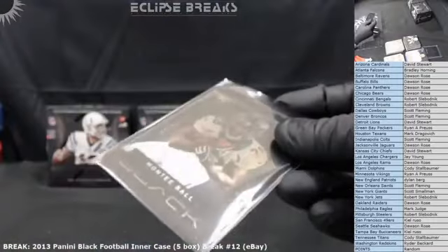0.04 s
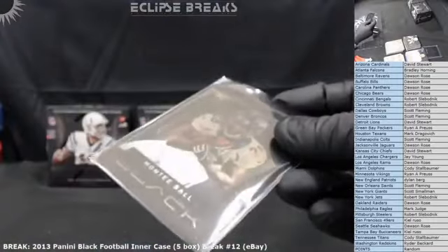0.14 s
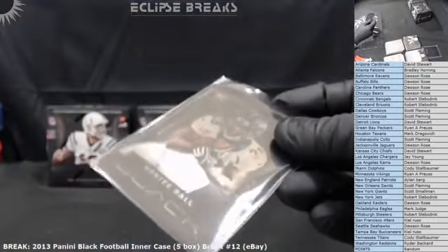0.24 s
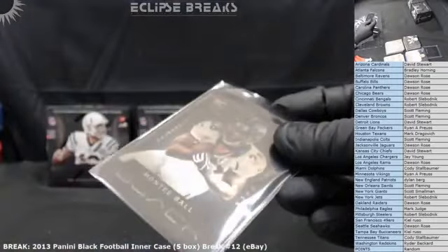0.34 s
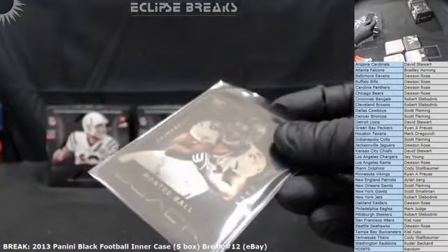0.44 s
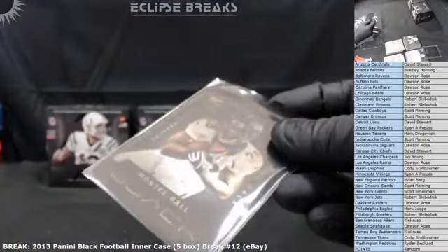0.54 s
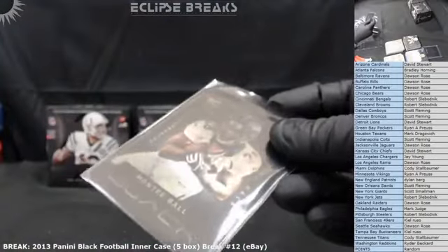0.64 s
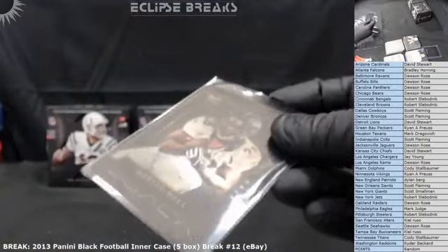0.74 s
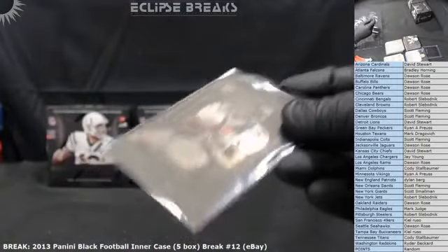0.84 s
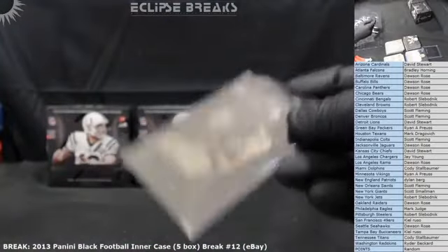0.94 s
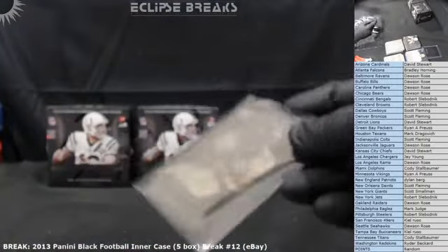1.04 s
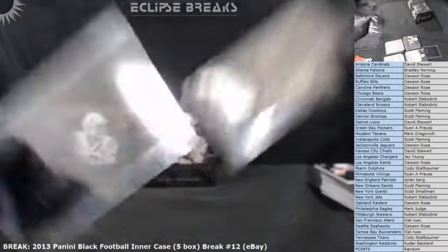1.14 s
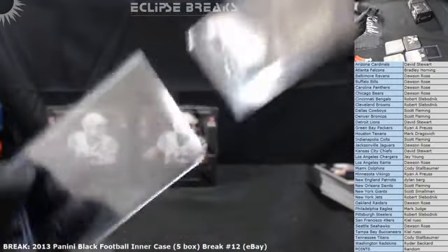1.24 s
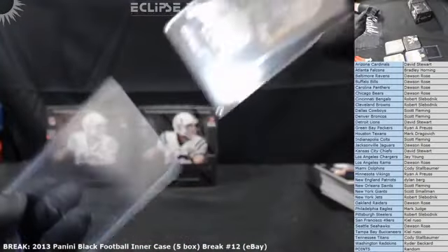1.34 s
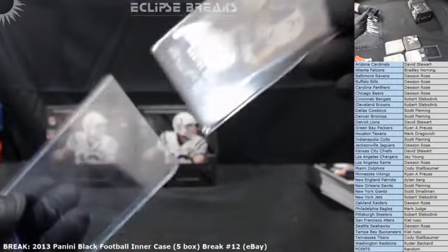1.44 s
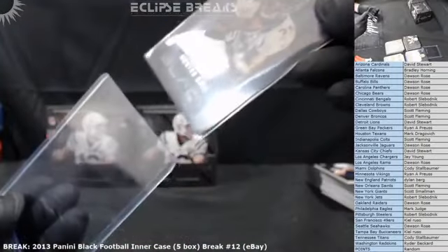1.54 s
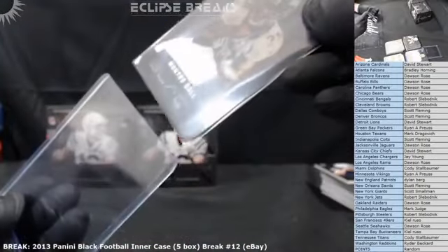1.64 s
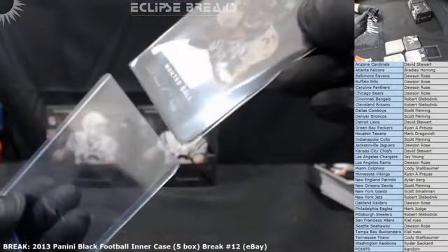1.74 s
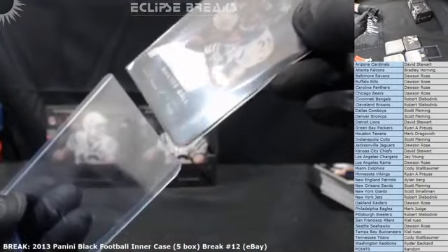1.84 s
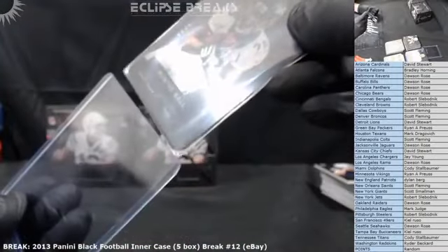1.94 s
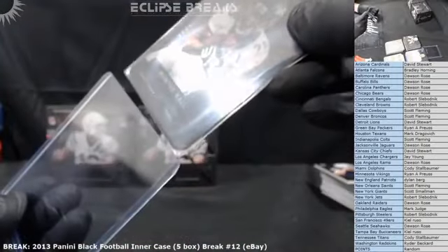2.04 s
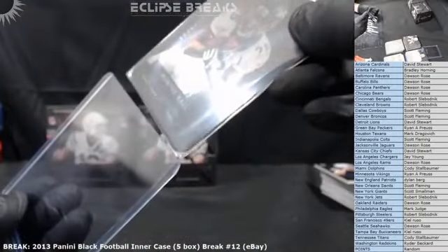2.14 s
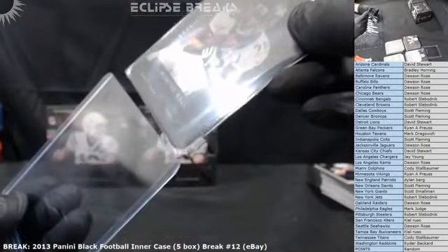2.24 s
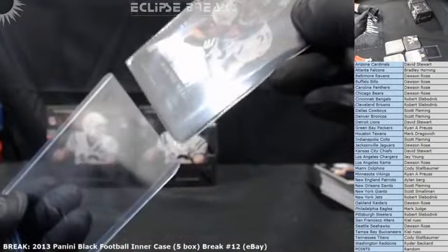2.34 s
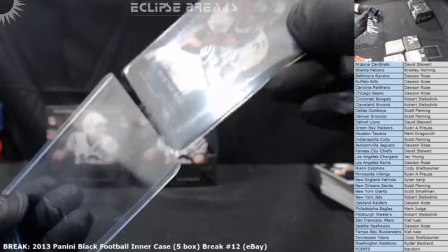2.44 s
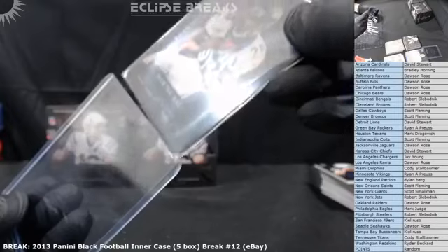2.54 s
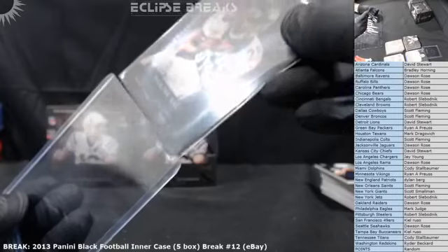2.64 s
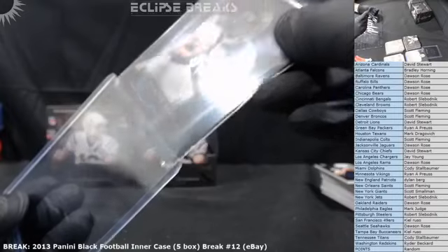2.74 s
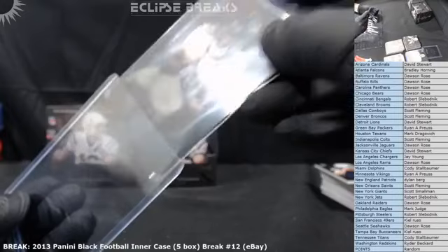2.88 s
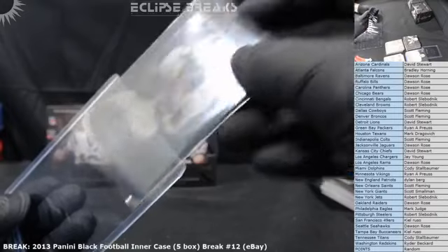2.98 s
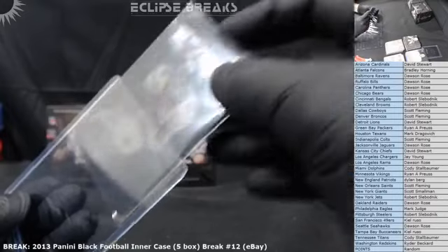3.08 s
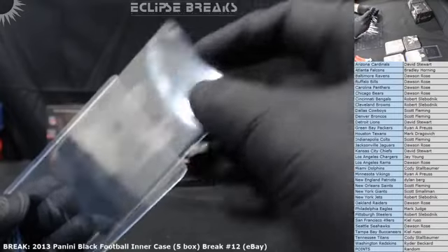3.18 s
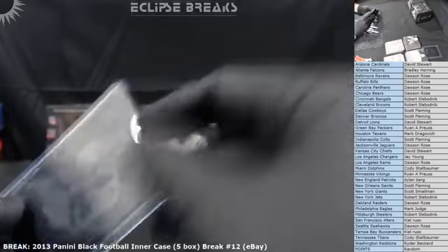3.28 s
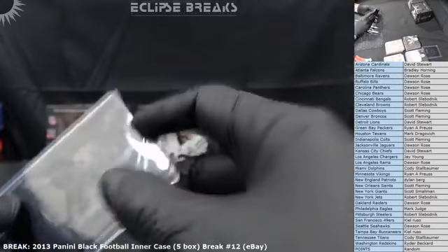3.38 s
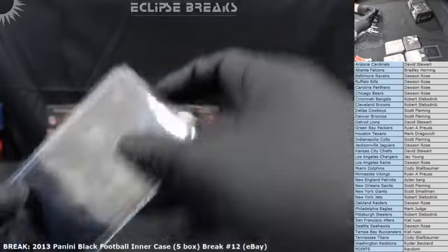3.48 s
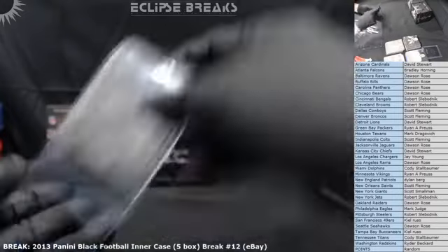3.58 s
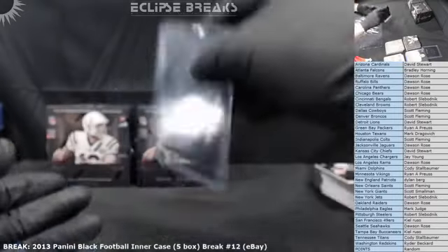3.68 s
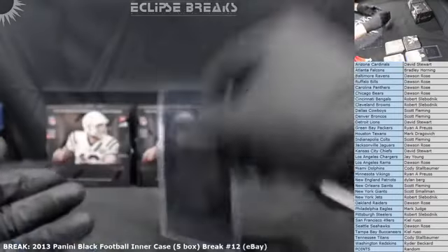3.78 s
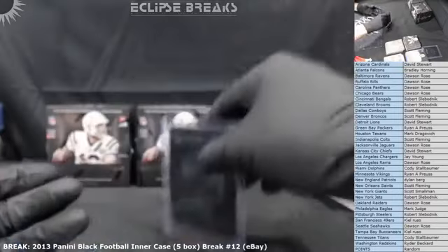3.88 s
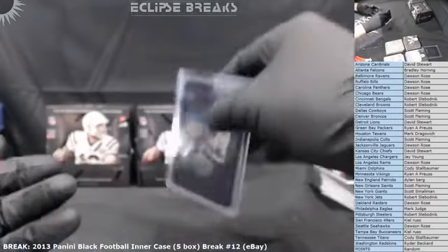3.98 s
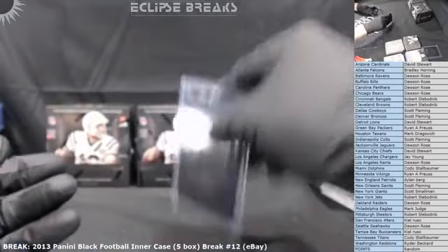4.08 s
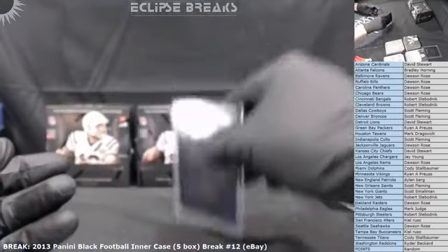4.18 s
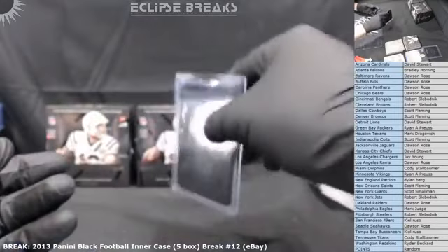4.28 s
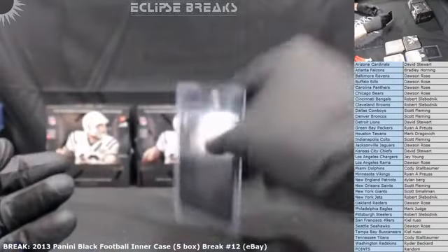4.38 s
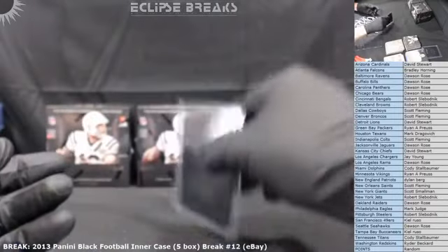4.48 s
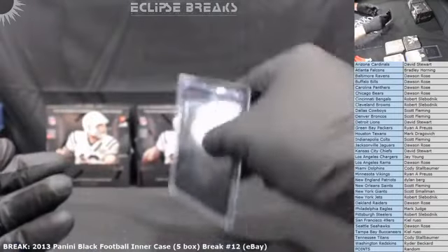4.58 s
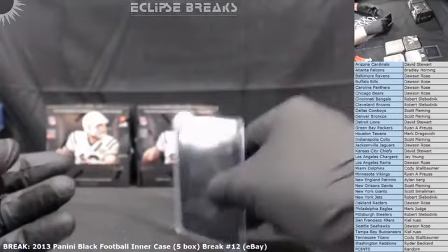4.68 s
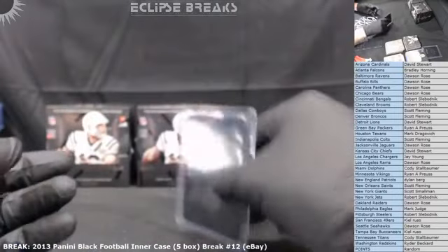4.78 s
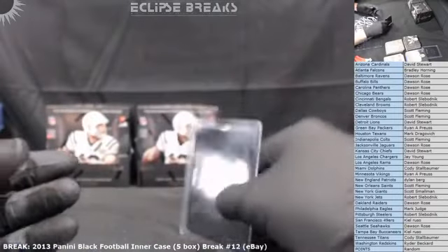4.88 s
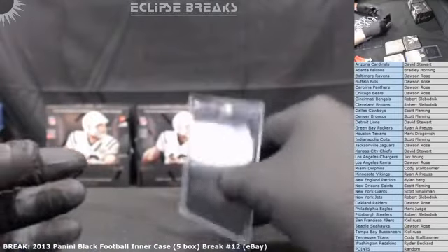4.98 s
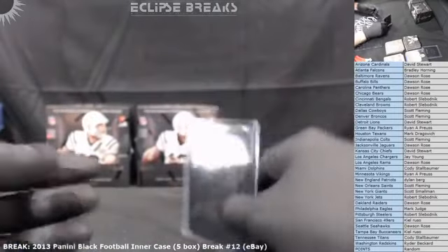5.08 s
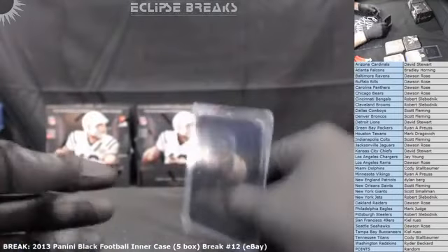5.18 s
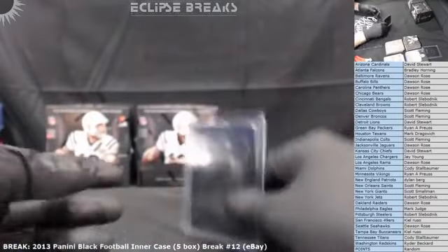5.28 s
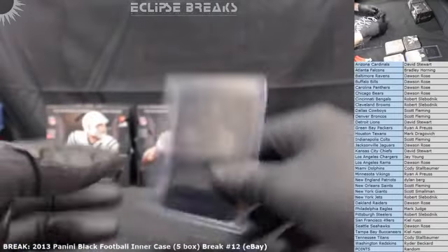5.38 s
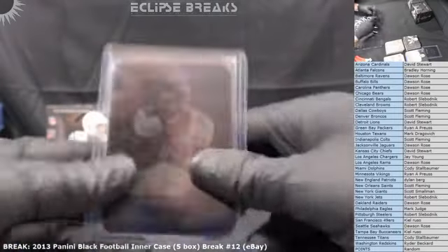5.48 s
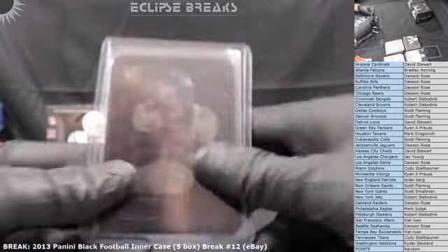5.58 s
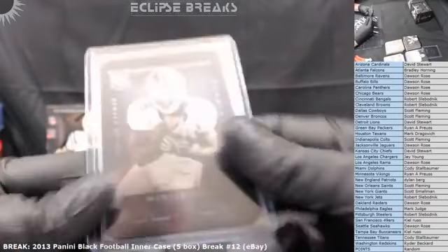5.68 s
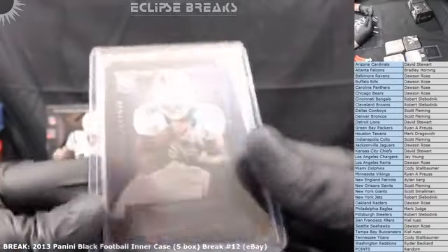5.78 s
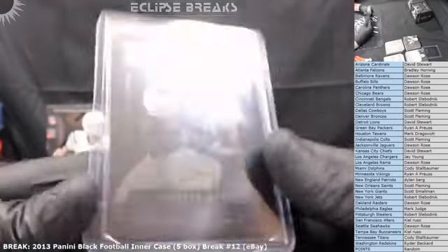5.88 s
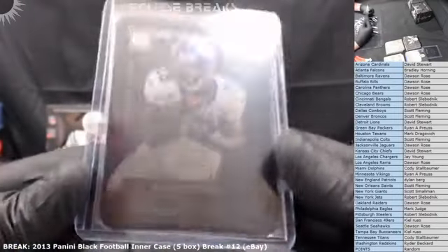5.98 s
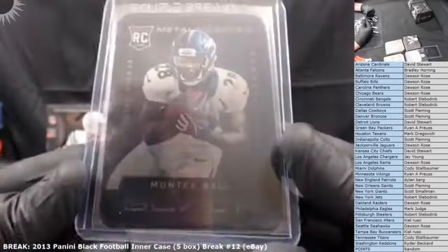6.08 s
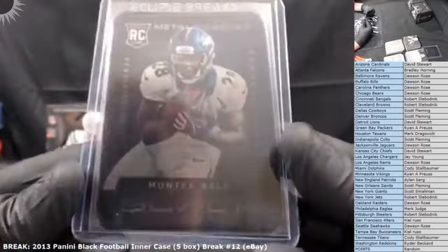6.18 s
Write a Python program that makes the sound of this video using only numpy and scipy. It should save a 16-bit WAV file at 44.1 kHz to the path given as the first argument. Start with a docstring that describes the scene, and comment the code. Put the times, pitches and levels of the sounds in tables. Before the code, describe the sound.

Gloved fingers softly rustle a sleeved trading card, with a few dull bumps on a table. The card slides into a rigid plastic holder with a fine hiss and a faint squeak, stopping with a click. The holder is tapped on the table seven times, each loud clack bringing a thump and slight distortion. Light rubbing and small clicks follow. A close stereo microphone picks up low rumble and a thin electrical whine in the small room.

```python
"""Trading card into a plastic holder

Close up, on a small stereo microphone at a table in a small room. After a few soft bumps a sleeved card
slides into a rigid holder, hissing with tiny slips, squeaks faintly and stops with a click. The holder
is tapped seven times to seat the card: it clacks, the table thumps and rings, and the input overloads.
Gloved fingers then turn it over, above a low room rumble and a thin electrical whine."""
import sys
import numpy as np
from scipy import signal
from scipy.fft import rfft, irfft, next_fast_len
from scipy.io import wavfile
from scipy.ndimage import map_coordinates

SR = 44100
rng = np.random.default_rng(int(sys.argv[2]) if len(sys.argv) > 2 else 0)


def bounce(signal):
    """Save signal as a 16-bit WAV file at the path given by the first command-line argument."""
    frames = np.transpose(np.atleast_2d(signal))
    limited = np.clip(frames, -1, 1)
    pcm = np.round(limited * 32767).astype(np.int16)
    wavfile.write(sys.argv[1], SR, pcm)


N = 274302

# room tone: freq_hz, relative_db
RUMBLE_SPECTRUM = [(12, -20.5), (20, 2.5), (51, -2.5), (70, -7.5), (119, -6), (271, -19), (366, -23),
                   (415, -22.5), (838, -31), (1020, -30), (1100, -32), (1650, -34), (1970, -39.5),
                   (8000, -50), (10400, -74), (17600, -120)]
# steady electrical tones: pitch_hz, level_db
WHINE_TONES = [(1001, -84), (1200, -91.5), (1599, -91.5), (1798, -96.5), (3601, -103), (6998, -101),
               (7499, -103), (8000, -86.5)]
# decay of the small room: freq_hz, t60_s
ROOM_DECAY = [(60, 0.71), (160, 0.24), (420, 0.21), (1100, 0.24), (3000, 0.24), (5000, 0.26), (7500, 0.16)]
# likeness of the sound at the microphone's two ports: freq_hz, correlation (0-1)
PORT_LIKENESS = [(100, 0.91), (500, 0.89), (1200, 0.26), (3000, 0), (8000, 0.7)]
# the microphone's treble roll-off: freq_hz, gain_db
MIC_RESPONSE = [(7300, 2.5), (8000, -8), (8800, -20.5), (10000, -27), (14000, -33.5)]

# something dragged on the table: freq_hz, relative_db
DRAG_SPECTRUM = [(100, 8), (300, 15.5), (600, 4), (1000, 10.5), (1400, -6.5), (2500, -10.5), (7000, -21.5)]
# soft bumps of things handled on the table: start_s, level_db
SOFT_BUMPS = [(0.464, -48), (0.508, -46), (0.586, -49.5), (0.657, -50.5), (0.693, -31), (0.702, -45),
              (0.715, -39), (5.525, -54.5), (5.759, -57.5), (5.79, -61.5)]
# one soft bump: freq_hz, relative_db
BUMP_SPECTRUM = [(60, -15), (180, 0), (310, 10), (550, -1.5), (800, -1.5), (1050, -13.5), (1350, -16),
                 (1900, -33.5), (3500, -32.5), (7000, -46.5)]
# dull low thuds carried through the table, from handling and from the holder's corner landing:
# start_s, level_db, pitch_hz
TABLE_THUDS = [(0.511, -39, 92), (0.584, -49, 69.6), (1.304, -31, 56.4), (1.463, -44.5, 59.7),
               (3.272, -28.5, 60), (3.821, -14.5, 98.5), (5.511, -42.5, 72)]
# small plastic clicks: start_s, level_db, centre_hz, width_octaves, t60_s
EDGE_CLICKS = [(0.869, -59.5, 1850, 0.86, 0.027), (2.497, -68, 2900, 0.93, .012),
               (2.687, -62.5, 3500, 1.2, 0.012), (3.022, -62, 2340, 0.7, 0.0089),
               (3.457, -57, 3070, 0.25, 0.032), (3.479, -62, 4540, 0.85, .023),
               (3.518, -61.5, 6920, 0.23, 0.036), (4.939, -58, 2950, 0.88, .016),
               (5.511, -49, 2350, 2.6, 0.018), (5.523, -51, 1510, 2, 0.019),
               (5.555, -49.5, 1400, 0.64, 0.029), (5.569, -50, 1490, 1.5, 0.01),
               (5.947, -54.5, 4750, 2.2, 0.014)]

# fine hiss of sliding plastic: freq_hz, relative_db
HISS_SPECTRUM = [(1500, -32), (3500, 1), (5000, 0.5), (6500, 1.5), (7600, -1.5), (8400, 3), (9500, -6.5)]
# the lower scrape under it: freq_hz, relative_db
SCRAPE_SPECTRUM = [(200, -5), (600, 5.5), (1200, -1.5), (2500, -3), (4000, -8), (7000, -31.5)]
# gloved fingers brush sleeve and holder: peak_s, length_s, hiss_db, scrape_re_hiss_db
FINGER_STROKES = [(.01, 0.1, -79, -4), (.14, 0.066, -81, -3), (.33, 0.041, -78.5, -2),
                  (.45, 0.087, -75.5, 6.5), (.52, 0.038, -75, 2), (.6, 0.098, -91, 0),
                  (.73, 0.044, -74.5, 10), (.795, 0.11, -72, -2), (.925, .04, -76, -10),
                  (.97, 0.11, -75, 2.5), (1.06, 0.03, -76, -6), (1.11, 0.11, -83.5, 7.5),
                  (1.33, 0.26, -84, 5), (3.29, 0.1, -75.5, 7.5), (3.365, 0.075, -71.5, 2.5),
                  (3.455, 0.035, -68, 4.5), (3.515, 0.056, -73.5, 7.5), (3.63, 0.19, -76, 0),
                  (4.96, 0.14, -78.5, 2.5), (5.18, 0.11, -76.5, 2.5), (5.28, 0.12, -76, 0.5),
                  (5.496, 0.2, -75, 4), (5.595, 0.03, -79, 7), (5.715, 0.12, -67.5, -1),
                  (5.835, 0.058, -71.5, 3), (5.915, 0.11, -70, -3.5), (6.11, 0.2, -71.5, -2.5)]
# the card is pushed home, rubbing harder as it goes deeper: time_s, hiss_db
CARD_PUSH = [(2.66, -89), (2.8, -78), (2.93, -73.5), (3.12, -72), (3.265, -60.5)]
# the sleeve squeaks as it enters: time_s, pitch_hz, level_db
SQUEAK_PATH = [(2.865, 6600, -91), (2.88, 6800, -66.5), (2.91, 7300, -71), (2.939, 7800, -79)]

# the holder's edge hits the table: start_s, clack_db, hardness_hz, second_corner_lag_s,
# second_re_first_db, ring_db, thump_hz, thump_t60_s, sway_db
HOLDER_TAPS = [(3.8049, -11.5, 3020, 0.016, -8.5, -21, 309, 0.045, -25.5),
               (4.0990, -12.5, 5000, 0.0067, -4, -21.5, 116.4, .1, -29),
               (4.3958, -10, 8000, 0.0021, 0.5, -27.5, 126.8, 0.11, -21),
               (4.6581, -12, 4480, .0081, -6.5, -20, 119, 0.089, -26.5),
               (4.8275, -16.5, 4000, .0031, 1.5, -21.5, 113.7, 0.074, -28),
               (5.0600, -20, 1700, 0.0028, 3.5, -28, 83.8, 0.073, -21),
               (5.2186, -22, 1700, .0029, 0.5, -28, 112, 0.058, -22.5)]
# the holder's clack: freq_hz, relative_db
CLACK_SPECTRUM = [(100, 4.5), (300, 7), (600, 10), (1200, -0.5), (1700, -9), (2200, -8), (2650, -16.5),
                  (3100, -13), (3700, -25), (6000, -25.5), (7300, -23), (8500, -31)]
# resonances of the table: pitch_hz, level_re_ring_db, t60_s
TABLE_MODES = [(129, -1, 0.23), (157, -26.5, 0.41), (190, 2.5, 0.078), (237.3, -4.5, 0.15),
               (278.4, -20.5, 0.44), (325.6, -5.5, 0.22), (368.6, -16.5, 0.2), (424, -3, 0.13),
               (487, -7, 0.16), (545.6, -0.5, 0.08), (575, -2, 0.092), (615, -2, 0.16), (751, -10, 0.074),
               (781, -13.5, 0.14), (920, -34, 0.19), (1374, -22, 0.058)]

THUD_BUILD_CYCLES = 0.39  # the heavy table top is slow to start


def amp(db):
    """Decibels to gain."""
    return 10 ** (np.asarray(db) / 20)


def unit(x):
    """Scale to rms 1."""
    return x / np.sqrt(np.mean(x ** 2) + 1e-20)


def along(points, hz):
    """Read (freq_hz, value) points on a log frequency axis."""
    freqs, values = np.transpose(points)
    return np.interp(np.log(hz + 1), np.log(freqs + 1), values)


def clock(size):
    """Seconds for each sample."""
    return np.arange(size) / SR


def wobble(rate_hz):
    """A smooth random curve with rate_hz knots a second."""
    knots = rng.standard_normal(int(N * rate_hz / SR) + 4)
    return map_coordinates(knots, [np.arange(N) * rate_hz / SR])


def held(start_s, end_s, fade_s):
    """Gain 1 from start to end, fading away on both sides."""
    t = clock(N)
    return np.exp(-np.abs(t - np.clip(t, start_s, end_s)) / fade_s)


def add(track, start_s, sound):
    """Mix a sound into the track."""
    part = track[:, round(start_s * SR):][:, :sound.shape[-1]]
    part += sound[..., :part.shape[1]]


def filtered(x, response):
    """Pass x through a complex response of frequency."""
    size = x.shape[-1]
    padded = next_fast_len(size + SR // 4)
    hz = np.fft.rfftfreq(padded, 1 / SR)
    return irfft(rfft(x, padded) * response(hz), padded)[..., :size]


def coloured(x, spectrum_db, size=4096):
    """Pass x through a causal filter of energy 1, shaped like spectrum_db(hz)."""
    hz = np.fft.rfftfreq(size, 1 / SR)
    cepstrum = irfft(np.log(amp(spectrum_db(hz))))
    cepstrum[1:size // 2] *= 2  # fold to minimum phase
    cepstrum[size // 2 + 1:] = 0
    kernel = irfft(np.exp(rfft(cepstrum)))
    return signal.fftconvolve(x, kernel[None] / np.linalg.norm(kernel), axes=1)[:, :x.shape[1]]


def port_noise(size):
    """White stereo noise, alike at both microphone ports in the bass and less so higher up."""
    def mid_side_gains(hz):
        angle = np.arccos(np.clip(along(PORT_LIKENESS, hz), -1, 1)) / 2
        return np.array([np.cos(angle), np.sin(angle)])
    mid, side = filtered(rng.standard_normal((2, size)), mid_side_gains)
    return np.array([mid + side, mid - side])


def steady_noise(spectrum):
    """Stereo noise of rms 1 with the given spectrum."""
    return unit(filtered(port_noise(N), lambda hz: amp(along(spectrum, hz))))


def in_room(x, wet_db):
    """The direct sound and the small room's answer, each frequency dying at its own speed."""
    hz, t, bands = signal.stft(port_noise(SR // 2), SR, nperseg=256)
    decay = amp(-60 * t / along(ROOM_DECAY, hz)[:, None])
    _, tail = signal.istft(bands * decay, SR, nperseg=256)
    tail *= np.clip(clock(tail.shape[1]) / 0.0073, 0, 1) ** 2  # reflections take a moment to gather
    response = amp(wet_db) * tail / np.linalg.norm(tail[0])
    response[:, 0] += 1
    return signal.fftconvolve(x, response, axes=1)


def strike(spectrum_db, t60_s, spike):
    """A contact: one sharp impulse and a dense, quickly dying ring."""
    t = clock(SR // 4)
    ring = port_noise(len(t)) * amp(-60 * t / t60_s)
    ring[:, 0] -= spike
    return coloured(ring, spectrum_db)


def mode(hz, t60_s, build_s=0.00092):
    """One struck resonance; it builds up briefly and reaches the two ports slightly out of step."""
    t = clock(SR // 2)
    phase = rng.normal(0, 0.14) * np.array([[1], [-1]])
    rise = 1 - np.exp(-(t / build_s) ** 2)
    return -np.sin(2 * np.pi * hz * t + phase) * amp(-60 * t / t60_s) * rise


def snap(centre_hz, octaves, t60_s):
    """A very short plastic snap: one broad hump of frequencies, almost dry."""
    hump_db = lambda hz: -10 * np.log10(1 + (np.log2((hz + 1) / centre_hz) / octaves) ** 4)
    return in_room(strike(hump_db, t60_s, spike=3), wet_db=-20)


def room_tone():
    """Low room rumble and a thin electrical whine."""
    whine = sum(amp(db) * np.sqrt(2) * np.sin(2 * np.pi * (hz * clock(N) + rng.random()))
                for hz, db in WHINE_TONES)
    return amp(-63.5) * steady_noise(RUMBLE_SPECTRUM) + whine


def table_handling():
    """A short drag, soft bumps and dull thuds stir mostly the table's low resonances."""
    drag = unit(steady_noise(DRAG_SPECTRUM) * amp(2.9 * wobble(rate_hz=54)))
    out = amp(-62.5) * held(start_s=0.41, end_s=0.67, fade_s=0.031) * drag
    for start_s, db in SOFT_BUMPS:
        bump = strike(lambda hz: along(BUMP_SPECTRUM, hz), t60_s=0.048, spike=7.1)
        add(out, start_s, in_room(amp(db) * bump, wet_db=-6.5))
    for start_s, db, hz in TABLE_THUDS:
        add(out, start_s, amp(db) * mode(hz, t60_s=0.081, build_s=THUD_BUILD_CYCLES / hz))
    return out


def edge_clicks():
    """Edges of card and holder catch and let go."""
    out = np.zeros((2, N))
    for start_s, db, centre_hz, octaves, t60_s in EDGE_CLICKS:
        add(out, start_s, amp(db) * snap(centre_hz, octaves, t60_s))
    return out


def finger_stroke(peak_s, length_s, rise_share=0.54):
    """Gain of one stroke: the finger speeds up, is fastest at peak_s and slows down."""
    t = clock(N) - peak_s
    width_s = length_s * np.where(t < 0, rise_share, 1 - rise_share)
    return np.exp(-np.abs(t / width_s) ** 1.3)  # between a point (1) and a bell (2)


def sliding():
    """Tiny slips make a fine hiss and a lower scrape, in the long push and in every finger stroke."""
    hiss = unit(steady_noise(HISS_SPECTRUM) * amp(1.8 * wobble(rate_hz=600)))
    scrape = unit(steady_noise(SCRAPE_SPECTRUM) * amp(2.5 * wobble(rate_hz=300)))
    times, push_db = np.transpose(CARD_PUSH)
    hiss_gain = amp(np.interp(clock(N), times, push_db)) * held(times[0], times[-1], fade_s=0.011)
    scrape_gain = amp(-5) * hiss_gain
    for peak_s, length_s, hiss_db, scrape_re_hiss_db in FINGER_STROKES:
        stroke = amp(hiss_db) * finger_stroke(peak_s, length_s)
        hiss_gain += stroke
        scrape_gain += amp(scrape_re_hiss_db) * stroke
    return hiss_gain * hiss + scrape_gain * scrape


def sleeve_squeak():
    """For a moment the slips lock into a thin rising tone."""
    t = clock(N)
    times, hz, db = np.transpose(SQUEAK_PATH)
    pitch_hz = np.interp(t, times, hz) * (1 + 0.012 * wobble(rate_hz=260))
    gain = amp(np.interp(t, times, db, left=-150, right=-150))
    return gain * np.sin(2 * np.pi * np.cumsum(pitch_hz) / SR)


def card_stop(stop_s=3.2714, wall_lag_s=0.001256):
    """The card hits the bottom of the holder: a bright tick, then the short clack of the walls."""
    out = np.zeros((2, N))
    add(out, stop_s, amp(-38.0) * snap(centre_hz=4500, octaves=0.8, t60_s=0.014))
    add(out, stop_s + wall_lag_s, amp(-32.5) * snap(centre_hz=1060, octaves=0.62, t60_s=0.019))
    return out


def holder_taps(thump_over_ring_db=15):
    """One corner lands just before the other; the holder clacks, the table rings, thumps and sways."""
    out = np.zeros((2, N))
    for tap in HOLDER_TAPS:
        start_s, clack_db, hardness_hz, lag_s, second_db, ring_db, thump_hz, thump_t60_s, sway_db = tap
        # a softer contact lacks treble
        contact_db = lambda hz: along(CLACK_SPECTRUM, hz) - 10 * np.log10(1 + (hz / hardness_hz) ** 2)
        for corner_s, db in (start_s, clack_db), (start_s + lag_s, clack_db + second_db):
            clack = amp(db) * strike(contact_db, t60_s=0.026, spike=4.8)
            add(out, corner_s, in_room(clack, wet_db=-13))
        scatter = rng.normal(0, [2, 0.006], (len(TABLE_MODES), 2))
        for k, ((hz, db, t60_s), (change_db, detune)) in enumerate(zip(TABLE_MODES, scatter)):
            ring = amp(ring_db + db + change_db) * mode(hz * (1 + detune), t60_s)
            add(out, start_s, (-1) ** k * ring)  # neighbouring modes swing oppositely
        thump = mode(thump_hz, thump_t60_s, build_s=THUD_BUILD_CYCLES / thump_hz)
        add(out, start_s, amp(ring_db + thump_over_ring_db) * thump)
        add(out, start_s, amp(sway_db) * mode(hz=70.0, t60_s=0.16, build_s=0.0059))
    return out


def scene():
    """The hands work close to the microphone, slightly to its left, over the room tone."""
    close = holder_taps() + table_handling() + edge_clicks() + card_stop() + sliding() + sleeve_squeak()
    return close * amp([[0.5], [-0.5]]) + room_tone()


def record(dry):
    """The microphone's input clips; its coupling makes the flat tops sag; the treble rolls off."""
    ceiling, hardness, coupling_hz, top_hz = amp(-19.0), 6, 32, 15000
    clipped = dry / (1 + np.abs(dry / ceiling) ** hardness) ** (1 / hardness)
    coupling = lambda hz: 1j * hz / (coupling_hz + 1j * hz)
    voiced = filtered(clipped, lambda hz: coupling(hz) * amp(along(MIC_RESPONSE, hz)))
    self_noise = amp(-91.5) * rng.standard_normal((2, N))
    return filtered(voiced + self_noise, lambda hz: hz < top_hz)


dry = scene()
out = record(dry)
bounce(out)
```